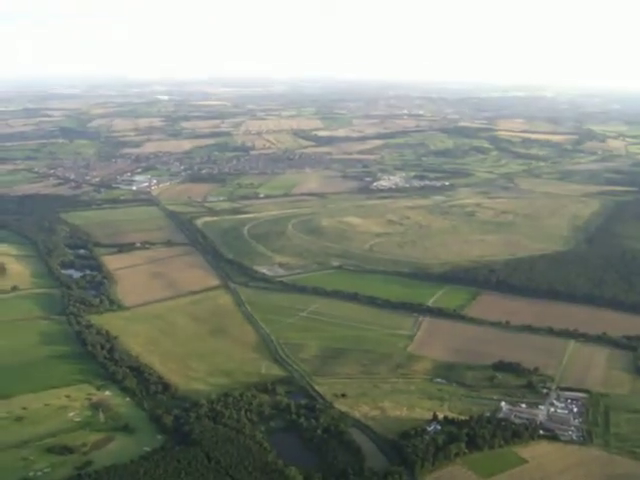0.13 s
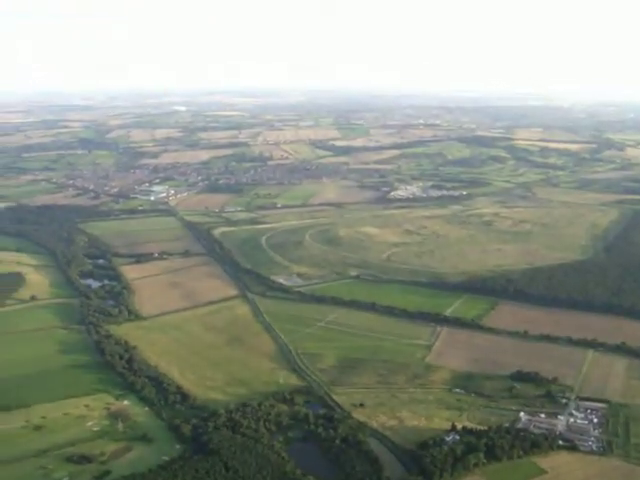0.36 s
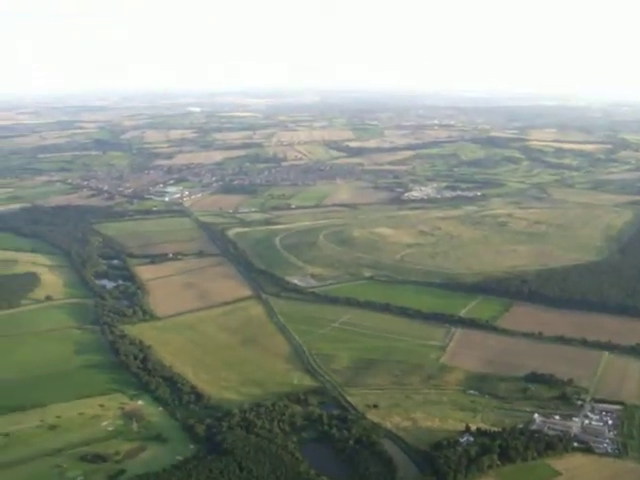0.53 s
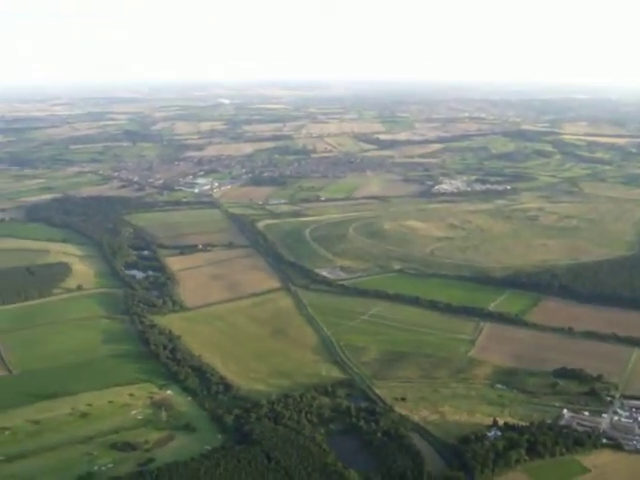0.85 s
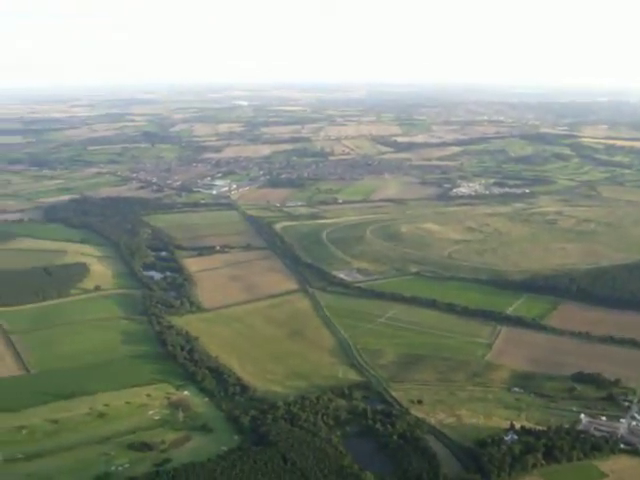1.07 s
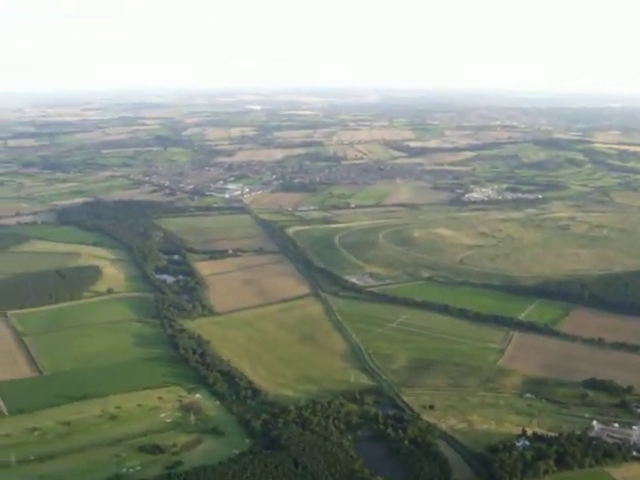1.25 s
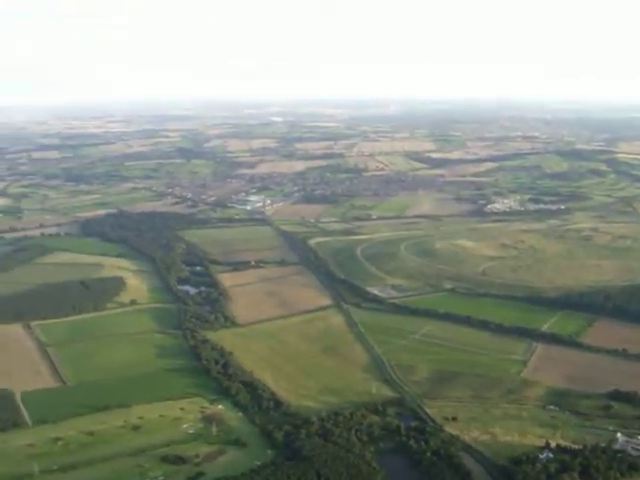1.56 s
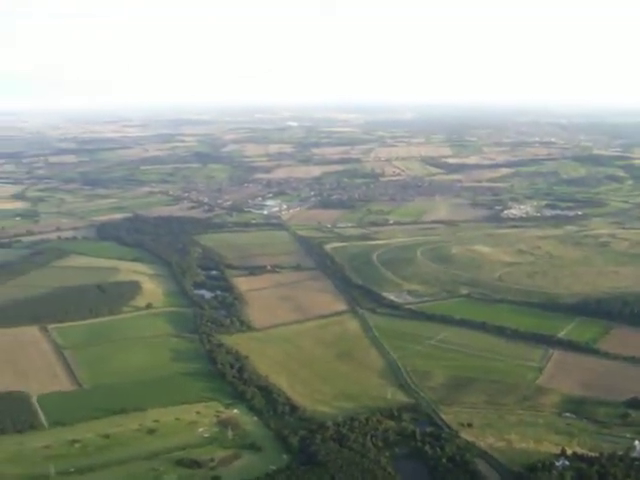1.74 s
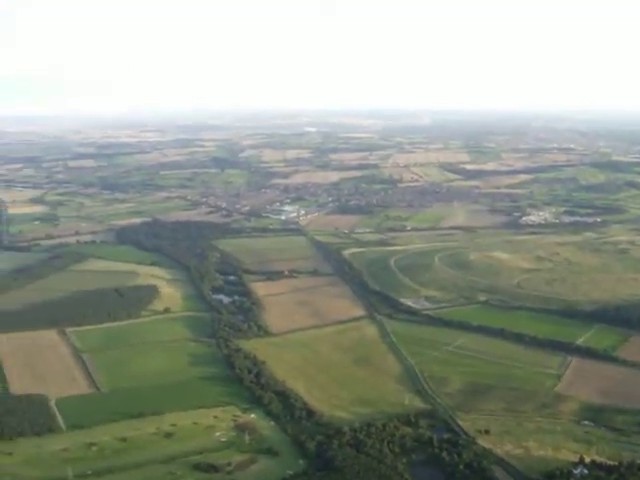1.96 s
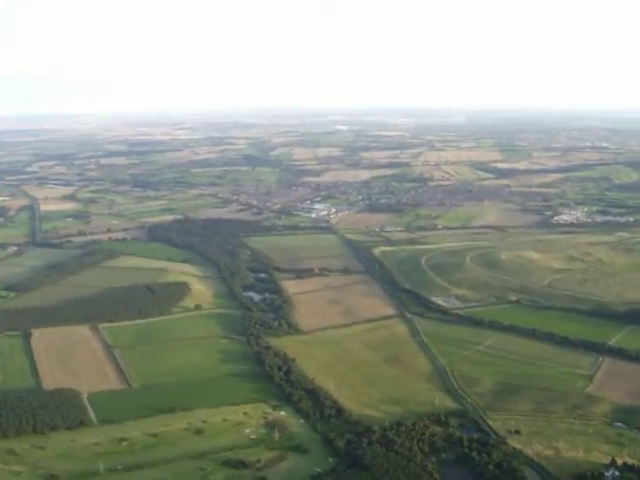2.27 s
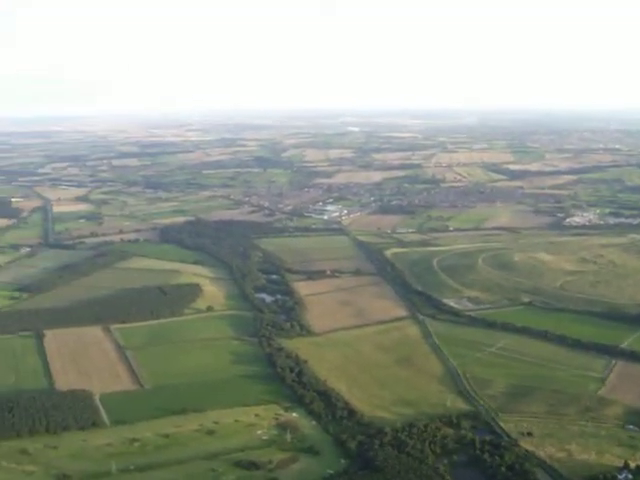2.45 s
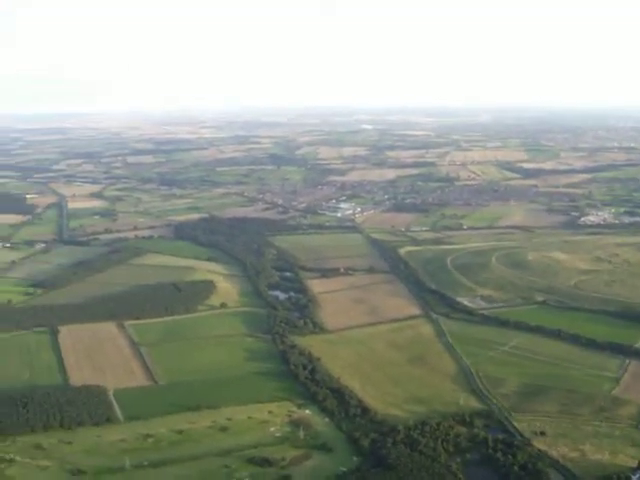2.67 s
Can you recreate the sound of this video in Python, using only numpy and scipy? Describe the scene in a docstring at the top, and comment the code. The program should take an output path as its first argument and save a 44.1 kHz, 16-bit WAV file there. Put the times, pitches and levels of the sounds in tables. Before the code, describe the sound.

A hot-air balloon burner roars continuously, deep and even, with a quieter bright gas hiss swelling briefly three or four times a second; heard close from the basket in open air, on a small, slightly saturated microphone.

```python
"""A hot-air balloon burner, heard from the basket by a small microphone that softly saturates the peaks.
Throughout, the flame roars low and steadily: shaped noise, coloured by the burner metal, with its bass evened.
Above it hisses the gas jet, bright noise with tiny spits, a little hollow at the very start.
It surges at 0.25 s and then three or four times a second, in close pairs near 0.9 s, 2 s and the end."""
import sys
import numpy as np
from scipy import signal
from scipy.fft import rfft, irfft, next_fast_len
from scipy.io import wavfile
from scipy.ndimage import uniform_filter1d, map_coordinates

SR = 44100
rng = np.random.default_rng(int(sys.argv[2]) if len(sys.argv) > 2 else 0)


def store_wav(level_fs):
    """Save 16-bit WAV to argv[1]."""
    pcm = np.round(np.clip(np.atleast_2d(level_fs), -1, 1) * 32767)
    wavfile.write(sys.argv[1], SR, pcm.T.astype(np.int16))


def rack_gain(trim_db):
    """Turn a fader trim in dB into the linear factor to multiply a signal by."""
    fader = np.asarray(trim_db, float)
    return 10 ** (fader / 20)


N = 123921  # samples


def unit(x):
    """Scale to rms 1."""
    return x / np.sqrt(np.mean(x ** 2) + 1e-20)


def along(points, hz):
    """Interpolate (freq_hz, value) points on a log frequency axis."""
    f, v = np.transpose(points)
    return np.interp(np.log(hz + 1), np.log(f + 1), v)


def curve(rows):
    """Interpolate (time_s, value) points to one value per sample."""
    s, v = np.transpose(rows)
    return np.interp(np.arange(N) / SR, s, v)


def wobble(rate):
    """A smooth random curve with rate knots a second."""
    knots = rng.standard_normal(N // 100)
    return map_coordinates(knots, [np.arange(N) * rate / SR])


def filtered(x, response):
    """Multiply the spectrum of x by a response of frequency in Hz."""
    m = next_fast_len(N + 8192)
    gain = response(np.fft.rfftfreq(m, 1 / SR))
    return irfft(rfft(x, m) * gain, m)[:N]


def patchy(patchy_db):
    """White noise whose gain varies in random patches of time and frequency."""
    z = signal.stft(rng.standard_normal(N), nperseg=512)[2]
    field = uniform_filter1d(rng.standard_normal(z.shape), size=8, axis=0)
    field = unit(uniform_filter1d(field, size=8, axis=1))
    return unit(signal.istft(z * rack_gain(patchy_db * field), nperseg=512)[1][:N])


# narrow resonances and dips of the burner metal: freq_hz, width_hz, gain_db
METAL_MODES = [(532, 55, 2.5), (926, 25, 3.5), (1120, 44, 2), (1713, 30, 2), (2084, 64, 3.5),
               (2790, 70, 3.5), (2830, 30, -4.5), (3170, 56, -6.5), (3485, 30, 6.5), (3980, 40, 1),
               (4490, 59, 4), (4760, 59, -0.5), (4960, 40, 1), (5360, 96, 4.5), (6550, 55, 6),
               (7300, 90, -0.5), (7870, 120, -3), (8080, 120, 1), (8600, 40, 0)]
# one more resonance, high in the hiss: freq_hz, width_hz, gain_db
HIGH_MODE = (10530, 50, 3.5)


def metal(hz):
    """Gain of the burner metal: each mode lifts or cuts a narrow bell of frequencies."""
    gain_db = 0
    for center, width, db in METAL_MODES + [HIGH_MODE]:
        gain_db = gain_db + db / (1 + (2 * (hz - center) / width) ** 2)
    return rack_gain(gain_db)


EVEN_S, EVEN_SHARE = .12, .7  # smoothing window in seconds, share of the slow level change removed


def evened(x):
    """Level changes slower than EVEN_S are mostly smoothed away."""
    size = round(EVEN_S * SR)
    power = uniform_filter1d(uniform_filter1d(x ** 2, size), size)
    power = np.abs(power) + 1e-12
    return x * (np.mean(x ** 2) / power) ** (EVEN_SHARE / 2)


# relative spectrum of the flame roar before the metal: freq_hz, density_db (per Hz)
ROAR_SPECTRUM = [(4.7, -36), (8.0, -7), (38, 0.5), (50, 3.5), (76, -4), (108, 1), (162, -8), (208, -5.5),
                 (248, -10), (296, -10), (371, -18), (464, -14.5), (627, -27.5), (729, -19), (847, -21.5),
                 (1120, -32), (1360, -42.5), (1710, -30.5), (2310, -42), (2820, -40), (3200, -40),
                 (4160, -80), (7040, -120)]
# slow drift of the roar above 180 Hz: time_s, change_db
UPPER_DRIFT = [(0, 0.5), (.7, 0), (1.4, 1), (2.1, .5), (2.81, 0.5)]
ROAR_DB = -16  # level of the whole roar before the evening and drift


def flame():
    """Turbulent combustion: broad low noise with very even bass and a slightly drifting upper part."""
    roar = unit(filtered(patchy(patchy_db=.5), lambda hz: rack_gain(along(ROAR_SPECTRUM, hz)) * metal(hz)))
    rumble = filtered(roar, lambda hz: hz < 45)
    boom = filtered(roar, lambda hz: (hz >= 45) & (hz < 85))
    body = filtered(roar, lambda hz: (hz >= 85) & (hz < 180))
    upper = roar - rumble - boom - body
    bass = evened(rumble) + evened(boom) + evened(body)
    return rack_gain(ROAR_DB) * (bass + rack_gain(curve(UPPER_DRIFT)) * upper)


# gas surges, added to the jet level: peak_s, swell_db, rise_s, fall_s
GAS_SURGES = [(.25, 5.5, 0.049, .008), (.585, 3, .01, 0.028), (.895, 3, .01, .03), (.96, 4.5, .02, 0.017),
              (1.32, 4, 0.057, .012), (1.685, 4, 0.094, 0.0089), (2.0, 5.5, 0.066, .007),
              (2.07, 3, 0.025, .012), (2.41, 3, 0.17, .02), (2.76, 4.5, .025, .012), (2.72, 3, 0.094, .03)]


def surge_swell():
    """Swell of the gas jet in dB: each surge rises to a peak and falls away at its own two speeds."""
    t = np.arange(N) / SR
    swell_db = np.zeros(N)
    for peak, db, rise, fall in GAS_SURGES:
        side = np.where(t < peak, rise, fall)
        swell_db += db * np.exp(-(np.abs(t - peak) / side) ** 1.24)
    return swell_db


SPIT_PER_S, SPIT_SPREAD_DB = 900, 2.5  # mean rate, random spread of each spit's level
SPIT_DB = -8  # spits against the hiss source, outside surges
SPIT_PER_SWELL = -0.2  # dB against the hiss source per dB of swell: spits grow a little less than hiss


def spits(swell_db):
    """Tiny random clicks of either sign, which swell with the jet once it is given its level."""
    draw = rng.random((2, N))
    struck = draw[0] < SPIT_PER_S / SR
    sign = np.sign(draw[1] - .5)
    clicks = struck * sign * rack_gain(SPIT_SPREAD_DB * rng.standard_normal(N))
    return rack_gain(SPIT_DB + SPIT_PER_SWELL * swell_db) * unit(clicks)


# relative spectrum of the jet hiss before the metal: freq_hz, density_db (per Hz)
JET_SPECTRUM = [(1820, -20), (3100, -11), (3600, -2), (4950, -4), (5360, -4), (5970, -6.5), (7010, -4.5),
                (7460, 0.5), (8510, -2.5), (9220, 0), (10500, -0.5), (11300, -4.5), (11600, -15),
                (12100, -20), (15800, -51), (22000, -120)]
# change in the hiss around 6.5 kHz, hollow when low: time_s, change_db
HOLLOWNESS = [(0, -3.5), (.18, 0.5), (.3, -0.5), (1.9, 0.5), (2.15, -1.5), (2.4, 0), (2.81, -1)]
# jet level between surges: time_s, level_db
JET_FLOW = [(0, -34), (.1, -36.5), (.4, -34.5), (.85, -35.5), (1.2, -34.5), (1.5, -34.5), (1.85, -34.5),
            (2.1, -35), (2.3, -33.5), (2.6, -35), (2.81, -33.5)]
SURGE_BRIGHT_DB = .6  # extra treble per 5 dB of swell
FLUTTER_DB, FAST_FLUTTER_DB = -0.33, 0.64  # scale of the 15 and 70 knots-a-second level wobbles


def jet():
    """Escaping gas: bright turbulent hiss with spits, louder and brighter at each surge."""
    swell_db = surge_swell()
    source = patchy(patchy_db=0.5) + spits(swell_db)
    hiss = unit(filtered(source, lambda hz: rack_gain(along(JET_SPECTRUM, hz)) * metal(hz)))
    treble = filtered(hiss, lambda hz: 1 / (1 + (6500 / (hz + 1)) ** 8))
    middle = filtered(hiss, lambda hz: np.exp(-((hz - 6500) / 1200) ** 4))
    hiss = hiss + (rack_gain(curve(HOLLOWNESS)) - 1) * middle
    hiss = hiss + (rack_gain(SURGE_BRIGHT_DB * swell_db / 5) - 1) * treble
    flutter_db = FLUTTER_DB * wobble(15) + FAST_FLUTTER_DB * wobble(70)
    return hiss * rack_gain(curve(JET_FLOW) + swell_db + flutter_db)


def scene():
    """Flame and jet together, as one channel."""
    return (flame() + jet())[None]


# microphone response: freq_hz, gain_db
MIC_RESPONSE = [(5, -10), (28, 0), (11000, 0), (11600, 0), (12000, -3), (12300, -10), (13000, -30)]
CLIP_TOP, CLIP_HARD = 0.93, 3.5  # ceiling in full scale, sharpness of the bend
OFFSET = .0087  # constant added, in full scale


def microphone(dry):
    """Small microphone: roll-off at both ends, soft saturation of the peaks, a small constant offset."""
    x = filtered(dry[0], lambda hz: rack_gain(along(MIC_RESPONSE, hz)))[None]
    squeezed = x / (1 + np.abs(x / CLIP_TOP) ** CLIP_HARD) ** (1 / CLIP_HARD)
    return squeezed + OFFSET


def top_cut(x):
    """Nothing passes above the cut-off."""
    return signal.sosfilt(signal.butter(12, 12270, fs=SR, output="sos"), x)


def record(dry):
    """The burner as the microphone in the basket delivers it."""
    mix = microphone(dry)
    return top_cut(mix)


dry = scene()
out = record(dry)
store_wav(out)
```